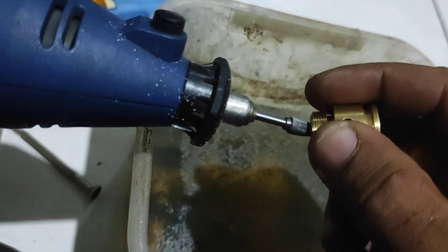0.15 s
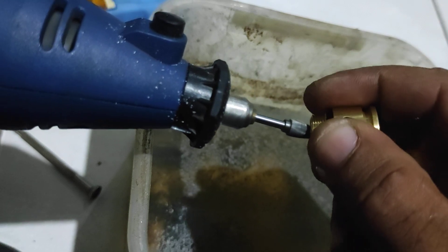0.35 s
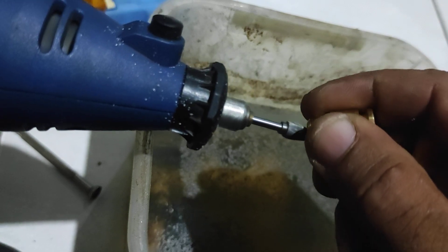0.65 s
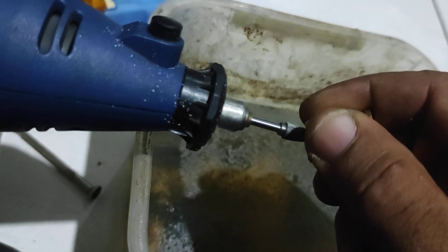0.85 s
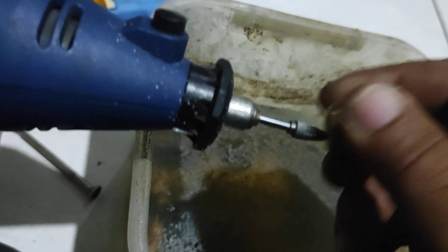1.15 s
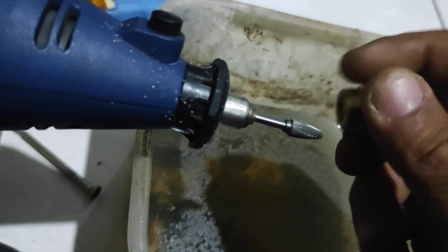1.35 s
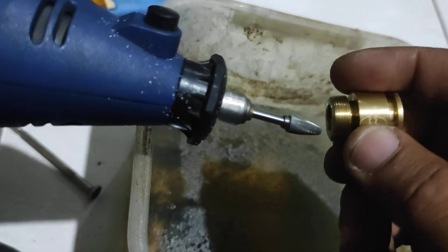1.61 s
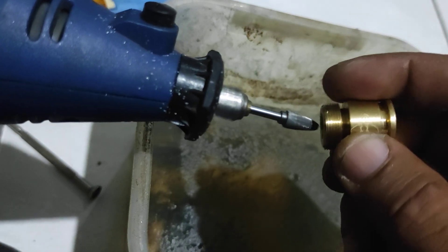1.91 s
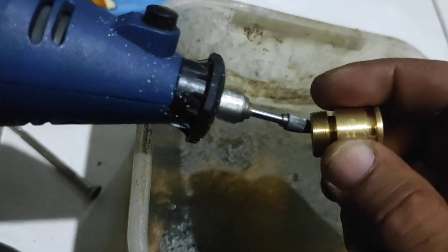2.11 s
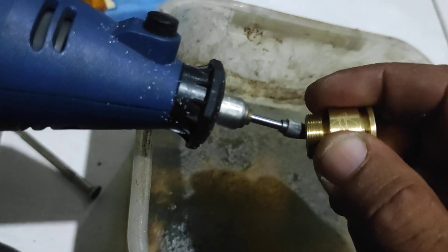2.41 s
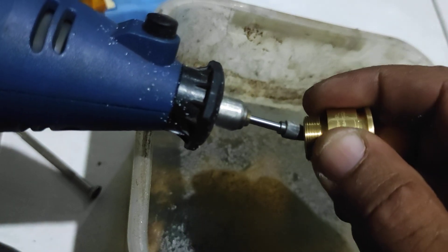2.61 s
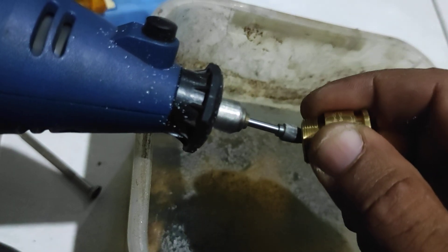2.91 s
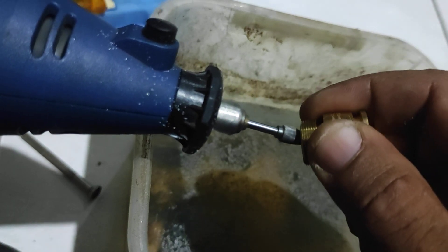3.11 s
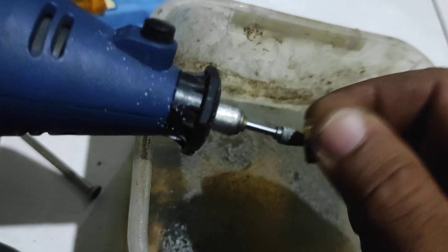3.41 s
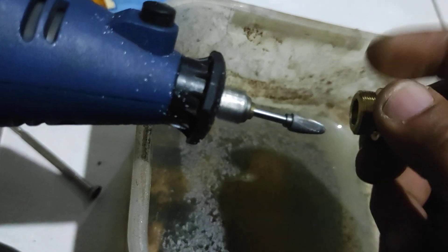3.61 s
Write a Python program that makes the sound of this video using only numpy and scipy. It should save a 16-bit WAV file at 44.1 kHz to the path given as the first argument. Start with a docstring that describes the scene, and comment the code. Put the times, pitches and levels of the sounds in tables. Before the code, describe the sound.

Close stereo phone pickup of a rotary tool: rough chattering grind on brass, a brief ring and quieter hissing motor, light knocks, then a second, harder grind that sags and stops, over faint rumble and hum.

```python
"""Close to a phone, a handheld rotary tool runs slowly; twice its fluted burr bites into a small brass fitting.
The shaft sags under each bite. The burr runs out of true, so it presses harder and lighter once every turn:
its flutes chatter as shaft multiples, the surface scrapes as nearly repeating noise, chips rasp as bright noise.
Light touches ring the fitting and knocks come around the start of the second bite.
Around the bites the motor hisses as coloured noise and whistles faintly over rumble and hum."""
import sys
import numpy as np
from scipy import signal
from scipy.fft import rfft, irfft, next_fast_len
from scipy.io import wavfile
from scipy.ndimage import map_coordinates

SR = 44100
rng = np.random.default_rng(int(sys.argv[2]) if len(sys.argv) > 2 else 0)


def transcribe(u):
    """Save the signal u as a 16-bit wav file named by the first command-line argument.

    u: samples, shape (n,) or (channels, n), limited to [-1, 1]; the rate is SR.
    q: integer samples, one column per channel.
    """
    v = np.clip(np.atleast_2d(u).T, -1, 1)
    q = np.round(v * 32767).astype(np.int16)
    wavfile.write(sys.argv[1], SR, q)


N = 165375  # samples, 3.75 s

# Shaft speed: time_s, speed_turns_per_s
SHAFT_SPEED = [(0, 68.9), (.14, 66.4), (.3, 63.2), (.46, 60.4), (.66, 59.4), (.94, 56.3), (1.17, 54.2),
               (1.25, 57.9), (1.4, 59), (1.6, 62), (1.8, 63.9), (2, 64.8), (2.1, 64.3), (2.3, 62.3),
               (2.54, 60), (2.78, 57.8), (2.94, 54.8), (3.1, 51), (3.26, 46), (3.42, 41.8), (3.49, 42.6),
               (3.55, 44.9), (3.75, 50.9)]

# The two bites, before layer trims: time_s, chatter_level_db, scrape_level_db, rasp_level_db
BITES = [
    [(0.0, -58, -28.5, -34), (0.022, -33.5, -44.5, -44.5), (0.058, -59, -34, -37.5),
     (0.086, -36, -35.5, -37.5), (0.208, -37, -30.5, -29), (0.318, -38.5, -34, -35),
     (0.416, -42.5, -34, -33), (0.43, -37, -34, -32.5), (0.658, -35, -33.5, -28.5),
     (0.754, -35.5, -33, -33), (0.994, -33, -36, -33), (1.03, -36.5, -30, -34), (1.056, -37, -33, -37),
     (1.166, -37.5, -36.5, -38), (1.172, -51, -47, -54), (1.19, -41, -48, -41)],
    [(2.2, -76, -49, -39), (2.218, -47.5, -45, -43), (2.31, -45, -39.5, -35.5), (2.338, -38, -35, -35),
     (2.458, -36.5, -33, -32), (2.55, -34.5, -32.5, -29), (2.67, -33, -32, -32), (3.054, -29, -30.5, -28.5),
     (3.174, -28.5, -30.5, -31), (3.266, -32.5, -30, -30), (3.336, -31.5, -32, -32.5),
     (3.362, -36.5, -29.5, -31), (3.462, -39, -36.5, -36), (3.496, -54, -37.5, -41), (3.504, -49, -41, -48),
     (3.53, -56, -67, -49)],
]
# Light touches of the burr: start_s, length_s, ring_level_db, scrape_level_db
TOUCHES = [(1.219, 0.0394, -37.5, -39.5), (2.183, 0.0081, -35, -37)]
# The burr's high side knocking as the second bite begins: start_s, level_db (before layer trims)
KNOCKS = [(2.168, -43), (2.223, -40), (2.233, -40), (2.253, -32.5), (2.267, -31.5), (2.285, -40),
          (2.299, -34.5), (2.315, -40)]
TOUCH_EDGE_S, TOUCH_RASP_DB = 0.0012, -1  # rasp relative to the touch's scrape
KNOCK_RISE_S, KNOCK_CHATTER_DB, KNOCK_RASP_DB = 0.0015, -0.2, -13  # levels relative to the knock

# How the burr meets the brass: time_s, grip (0 tip, 1 flank, 2 pressed hard)
GRIP = [(0, 0), (.39, 0), (.43, 1), (1.2, 1), (2.2, 0), (2.31, 0), (2.335, 1), (2.88, 1), (3.05, 2),
        (3.75, 2)]
# Depth of the once-a-turn swell (fraction), one entry per grip: tip, flank, pressed hard
RUNOUT_DEPTH = (.4, .34, .2)
# Balance of the shaft multiples, one row each from FIRST_ORDER up: tip_db, flank_db, pressed_hard_db
CHATTER_LINES = [(0, -17, -28), (-2, -11, -22), (-6, -13, -18), (-6, -5, -11), (-1, -1, -3), (-4, 0, 0),
                 (-16, -14, -9), (-12, -16, -16), (-13, -14, -18), (-13, -12, -21), (-16, -18, -22),
                 (-18, -18, -14), (-15, -19, -9), (-17, -17, -13)]
FIRST_ORDER = 10
SPREAD_RAD, CENTRE_ORDER = 0.45, 14  # the burst of flutes sweeps, so it fills most of the turn
LINE_WAVER_DB, LINE_SLIP_RAD = 1.3, 0.25
CHATTER_DB, SCRAPE_DB, GRIT_DB = -0.2, -0.5, -2  # layer trims
CHATTER_LEFT_DB = 3  # raised left, lowered right
BOUNCE_DB = 1  # unsteady hand
SCRAPE_LASTS_TURNS, SCRAPE_ABOVE_HZ = 5, 850

# Colour of fitting and tool body: pitch_hz, left_db, right_db, left_lead_rad
BODY_COLOUR = [(150, -54, -60, -12), (372, -16.5, -32, -6.5), (575, -11.5, -54, 1), (634, 0.5, -23, 1.2),
               (790, -4, -3.5, 0.5), (920, -9, -16.5, 0.07), (1385, -13.5, -12, 1.5),
               (1657, -6, -14.5, 4.5), (1650, -41.5, -9.5, 7), (2470, -2, -4.5, 3), (2523, -46, -8, -3),
               (2610, -36, -47, 14.5), (3530, -45.5, -48, -15)]
# Colour of the chip rasp: pitch_hz, left_db, right_db
RASP_COLOUR = [(2370, -25, -26.5), (3250, -20, -19), (3480, -11.5, -13.5), (4320, -31, -19.5),
               (4505, -11, -19), (5330, -23.5, -14.5), (6070, -19.5, -10), (6830, -12, -22),
               (7230, -41, -8), (7830, -20, -11), (8590, -9.5, -18.5), (9320, -21, -34),
               (10175, -14.5, -37), (9720, -49, -24.5), (11410, -23, -28.5), (11050, -61, -64),
               (12500, -57, -31), (13400, -85, -53), (14800, -70, -70)]
# Ring of the loosely held fitting: pitch_hz, left_db, right_db
TOUCH_RING_COLOUR = [(700, -27, -34), (1000, 1, -14), (1136, 10, 5), (1270, -27, -20), (1800, -48, -48)]

# Colour of the motor's brush and fan hiss: pitch_hz, left_db, right_db
HISS_COLOUR = [(120, -60, -53), (252, -21, -10.5), (328, -11.5, -14.5), (462, -8, -12),
               (1110, -13.5, -18.5), (1260, -13.5, -19.5), (3120, -18.5, -17.5), (3080, -25, -26),
               (3630, -13, -11.5), (4760, -18.5, -19), (6170, -9.5, -9), (6380, -9.5, -8.5), (7600, -8, 1),
               (7910, -9, -8), (8800, -4, -22), (9850, -15.5, -18.5), (9950, -25, -26), (14200, -33, -36),
               (15200, -57, -55)]
HISS_DB, HISS_DB_PER_HZ = -41, 0.09  # level at 63 turns/s, and its rise per turn/s
LEFT_LAG = 10  # samples, the tool is nearer the right port
# Brush whine, one row per harmonic, before waver and speed: left_db, right_db, blur_rad
BRUSH_LINES = [(-62, -63, .4), (-64, -62, .5), (-63, -61, .4), (-60, -53, .6), (-53, -46, 1.9),
               (-60, -62, .7)]
# Which harmonics of the brush pitch sound: harmonic (number)
BRUSH_HARMONICS = [3, 4, 5, 7, 8, 9]
BRUSH_ORDER = 15.43  # cycles per shaft turn
# Thin motor whistles, before waver: left_db, right_db, blur_rad
WHISTLE_LINES = [(-58, -72, 0.22), (-66, -64, 0.28), (-52.5, -66, 0.18), (-61.5, -70, 0.26),
                 (-65, -71, 0.25)]
# Pitch of each whistle: order (cycles per shaft turn)
WHISTLE_ORDERS = [12.35, 13.8, 17.3, 18.6, 34.6]
WHISTLE_WAVER_DB = 2.5
# The high whine fades as the shaft slows: orders above this, dB per turn/s, neutral turns/s
HIGH_ORDER, HIGH_DB_PER_HZ, FREE_HZ = 50, 0.85, 63

# Rumble, before waver: time_s, lower_band_level_db, upper_band_level_db
RUMBLE_LEVELS = [(0.0, -61.5, -43), (0.87, -55, -47.5), (1.63, -56, -48), (1.85, -48.5, -46.5),
                 (2.22, -57, -60.5), (2.41, -37.5, -55), (2.47, -39.5, -43), (2.52, -40.5, -49),
                 (3.08, -53, -46), (3.21, -70, -55), (3.26, -67, -45), (3.63, -55, -55.5),
                 (3.75, -38.5, -46)]
# Colour of the lower rumble: pitch_hz, left_db, right_db
LOWER_RUMBLE_COLOUR = [(25, -30, -35), (60, -20, -26), (96, 4.5, 0.5), (123, -11, -12), (178, 8.5, 4.5),
                       (216, -11, -1.5), (253, -50, -54)]
# Colour of the upper rumble: pitch_hz, left_db, right_db
UPPER_RUMBLE_COLOUR = [(170, -8, -19), (213, -5, 0.5), (237.3, 7, -2.5), (318, -16.5, -20), (470, -19, -24),
                       (700, -53, -43)]
# Steady-pitched hums, before waver and left/right balance: pitch_hz, level_db, blur_rad
HUMS = [(47, -63.5, .1), (77, -59.5, 0.37), (142.9, -53, 0.16), (181, -63, 0.18)]
HUM_LEFT_DB = 2  # raised left, lowered right
TOP_HZ = 15300  # band limit of the phone


def amp(db):
    """Decibels to linear gain."""
    return 10 ** (np.asarray(db) / 20)


def unit(x):
    """Scale to an rms of 1 over everything in x."""
    return x / np.sqrt(np.mean(x ** 2) + 1e-20)


def curves(rows, outside=None):
    """One value per sample for each column after the time."""
    times, *columns = np.transpose(rows)
    t = np.arange(N) / SR
    return [np.interp(t, times, column, outside, outside) for column in columns]


def wobble(rate):
    """A smooth random curve, rate knots a second."""
    knots = rng.standard_normal(int(N * rate / SR) + 4)
    return map_coordinates(knots, [np.arange(N) * rate / SR])


def coloured(x, table):
    """Filter x to a left and a right colour; white noise of rms 1 keeps its rms over both sides."""
    m = next_fast_len(N + 8192)
    pitch_hz, *columns = np.transpose(table)
    log_f = np.log(np.fft.rfftfreq(m, 1 / SR) + 1)
    drawn = [np.interp(log_f, np.log(pitch_hz + 1), column) for column in columns]
    left_lead = drawn[2] if len(drawn) > 2 else 0
    phase = np.exp(0.5j * np.outer([1, -1], left_lead))
    gain = unit(amp(drawn[:2])) * phase
    return irfft(rfft(x, m) * gain, m)[:, :N]


def noise(alike, lag=0):
    """Stereo white noise with a shared part that may reach the left port late."""
    shared, *separate = rng.standard_normal((3, N))
    alike = np.clip(alike, 0, 1)
    both = np.array([np.roll(shared, lag), shared])
    return np.sqrt(alike) * both + np.sqrt(1 - alike) * np.array(separate)


def contact():
    """Gains of chatter, scrape, rasp and ring as bites, light touches and knocks press the burr on brass."""
    t = np.arange(N) / SR
    bites = np.sum([amp(curves(rows, outside=-200)) for rows in BITES], axis=0)
    gains = np.vstack([bites, np.zeros(N)])
    for start_s, length_s, ring_db, scrape_db in TOUCHES:
        since = t - start_s
        touch = np.clip(np.minimum(since, start_s + length_s - t) / TOUCH_EDGE_S, 0, 1)
        gains[1:3] += amp([[scrape_db], [scrape_db + TOUCH_RASP_DB]]) * touch
        gains[3] += amp(ring_db) * touch * (0.5 + 0.5 * since / length_s)  # the ring builds up
    for start_s, level_db in KNOCKS:
        u = np.maximum(t - start_s, 0) / KNOCK_RISE_S
        layers_db = level_db + np.array([[KNOCK_CHATTER_DB], [0], [KNOCK_RASP_DB]])
        gains[:3] += amp(layers_db) * u * np.exp(1 - u)
    return gains


def flute_chatter(turns, grip):
    """Flutes striking in a burst once a turn: a stack of shaft multiples with swept phases."""
    lines = []
    for grip_db in CHATTER_LINES:
        line_db = np.interp(grip, range(len(grip_db)), grip_db)
        lines.append(amp(line_db + LINE_WAVER_DB * wobble(9)))
    lines = np.array(lines)
    lines = lines / np.sqrt(np.sum(lines ** 2, 0) / 2)  # steady power however the balance moves
    chatter = np.zeros(N)
    for order, gain in enumerate(lines, FIRST_ORDER):
        sweep = SPREAD_RAD * (order - CENTRE_ORDER) ** 2
        slip = LINE_SLIP_RAD * wobble(12)
        chatter += gain * np.cos(2 * np.pi * order * turns + sweep + slip)
    return amp(CHATTER_DB) * amp([[CHATTER_LEFT_DB], [-CHATTER_LEFT_DB]]) * chatter


def surface_scrape(turns, swell):
    """A rough surface read round each turn and slowly replaced, plus grit that never repeats."""
    steps = 256  # surface points per turn
    surface = rng.standard_normal((int(turns[-1] / SCRAPE_LASTS_TURNS) + 3, steps + 1))
    surface[:, -1] = surface[:, 0]  # close the circle
    pattern = map_coordinates(surface, [turns / SCRAPE_LASTS_TURNS, turns % 1 * steps], order=1)
    highpass = signal.butter(2, SCRAPE_ABOVE_HZ, 'high', fs=SR, output='sos')
    scrape = unit(coloured(signal.sosfilt(highpass, swell * pattern), BODY_COLOUR))
    grit = unit(coloured(signal.sosfilt(highpass, swell * noise(alike=0.47)), BODY_COLOUR))
    return amp(SCRAPE_DB) * scrape + amp(GRIT_DB) * grit


def chip_rasp(swell):
    """Chips rasping: crackly bright noise that follows the once-a-turn swell more gently."""
    crackle = amp(1.63 * wobble(500))
    return unit(coloured(swell ** 0.5 * crackle * noise(0.44, LEFT_LAG), RASP_COLOUR))


def fitting_ring():
    """The loosely held fitting ringing: noise narrowed around its resonances."""
    return unit(coloured(noise(alike=0.92), TOUCH_RING_COLOUR))


def burr(turns):
    """An untrue burr presses harder and lighter once every turn, so scrape and rasp swell with the shaft."""
    chatter_gain, scrape_gain, rasp_gain, ring_gain = contact()
    grip, = curves(GRIP)
    depth = np.interp(grip, range(len(RUNOUT_DEPTH)), RUNOUT_DEPTH)
    turn_phase = 2 * np.pi * turns + 0.34 * wobble(4.85)
    swell = np.maximum(1 + depth * np.cos(turn_phase), 0)
    hand = amp(BOUNCE_DB * wobble(29.48))
    # the powers set how much of the hand's bounce each layer takes
    chatter = hand ** 0.5 * chatter_gain * flute_chatter(turns, grip)
    scrape = hand * scrape_gain * surface_scrape(turns, swell)
    rasp = hand ** 0.63 * rasp_gain * chip_rasp(swell)
    return chatter + scrape + rasp + ring_gain * fitting_ring()


def motor_hiss(speed):
    """Brush and fan noise that grows with shaft speed."""
    level_db = HISS_DB + HISS_DB_PER_HZ * (speed - 63) + 0.31 * wobble(11)
    return amp(level_db) * unit(coloured(noise(0.32, LEFT_LAG), HISS_COLOUR))


def motor_whine(speed, turns):
    """Brush whine and thin whistles: blurred sines tied to the shaft angle."""
    orders = [BRUSH_ORDER * harmonic for harmonic in BRUSH_HARMONICS] + list(WHISTLE_ORDERS)
    lines = list(BRUSH_LINES) + list(WHISTLE_LINES)
    whine = np.zeros((2, N))
    for order, (left_db, right_db, blur_rad) in zip(orders, lines):
        speed_db = (order > HIGH_ORDER) * HIGH_DB_PER_HZ * (speed - FREE_HZ)
        level_db = [[left_db], [right_db]] + WHISTLE_WAVER_DB * wobble(5.2) + speed_db
        whine += amp(level_db) * np.sin(2 * np.pi * order * turns + blur_rad * wobble(order + 15))
    return whine


def rumble():
    """The place's lumpy low rumble: two bands of noise, each with its own level curve."""
    total = np.zeros((2, N))
    for level_db, colour in zip(curves(RUMBLE_LEVELS), [LOWER_RUMBLE_COLOUR, UPPER_RUMBLE_COLOUR]):
        total += amp(level_db + 1.4 * wobble(9.1)) * unit(coloured(noise(alike=0.89), colour))
    return total


def hum():
    """The place's few low hums: sines wavering in level and phase."""
    t = np.arange(N) / SR
    total = np.zeros(N)
    for pitch_hz, level_db, blur_rad in HUMS:
        tone = np.sqrt(2) * np.sin(2 * np.pi * pitch_hz * t + blur_rad * wobble(9))  # rms near 1
        total += amp(level_db + 0.51 * wobble(4.8)) * tone
    return total * amp([[HUM_LEFT_DB], [-HUM_LEFT_DB]])


def scene():
    """One shaft turns both burr and motor, over the rumble and hum of the place."""
    speed, = curves(SHAFT_SPEED)
    turns = np.cumsum(speed) / SR
    tool = burr(turns) + motor_hiss(speed) + motor_whine(speed, turns)
    return tool + rumble() + hum()


def record(dry):
    """The phone keeps nothing above its band limit."""
    m = next_fast_len(N + 8192)
    kept = np.fft.rfftfreq(m, 1 / SR) < TOP_HZ
    return irfft(rfft(dry, m) * kept, m)[:, :N]


dry = scene()
out = record(dry)
transcribe(out)
```